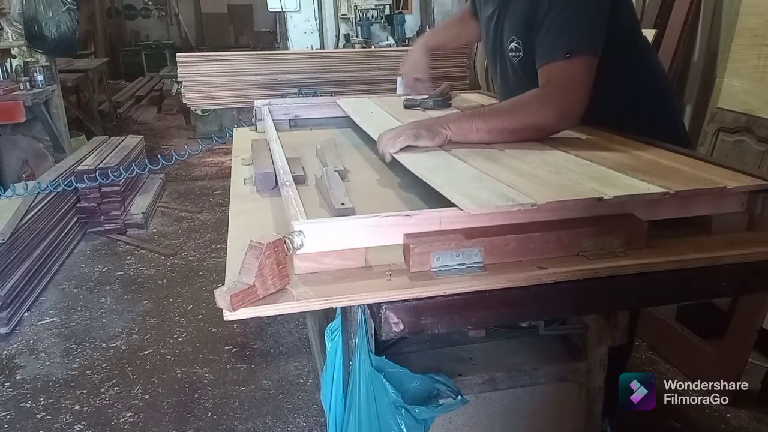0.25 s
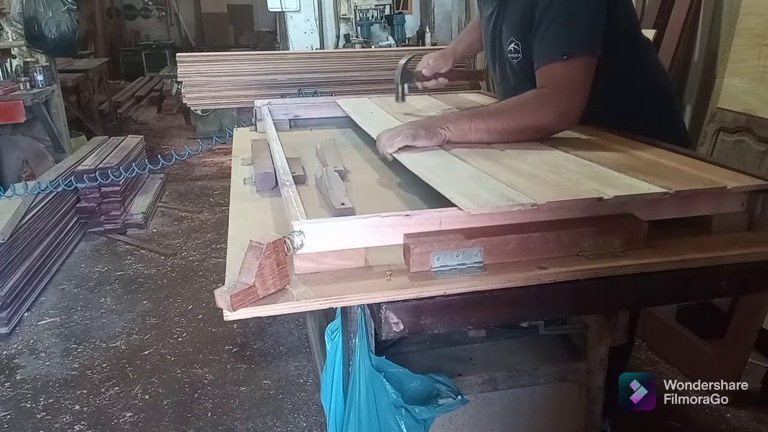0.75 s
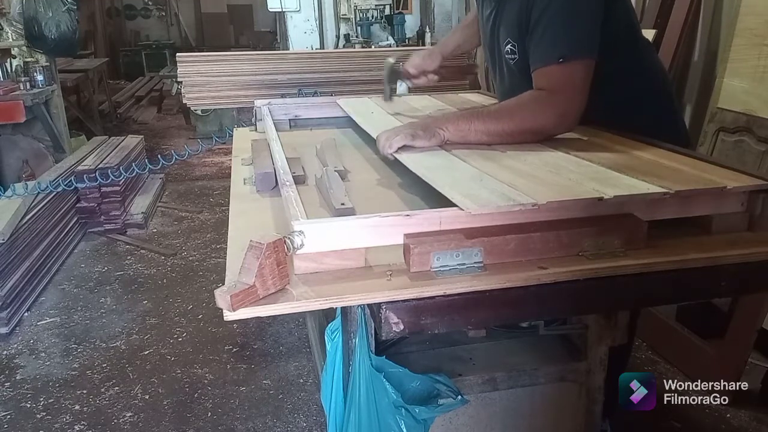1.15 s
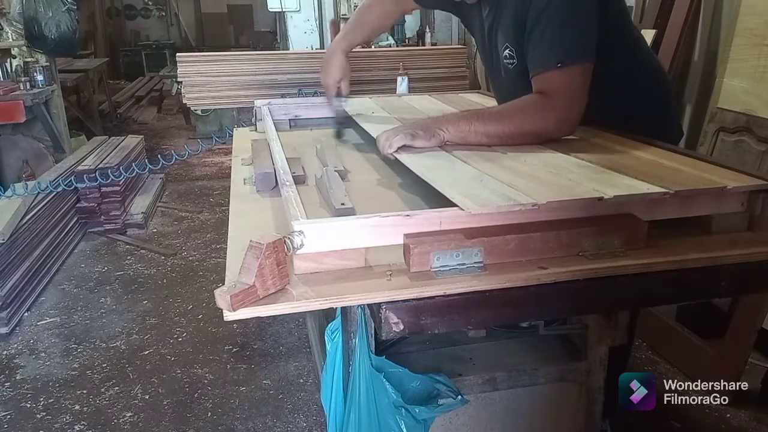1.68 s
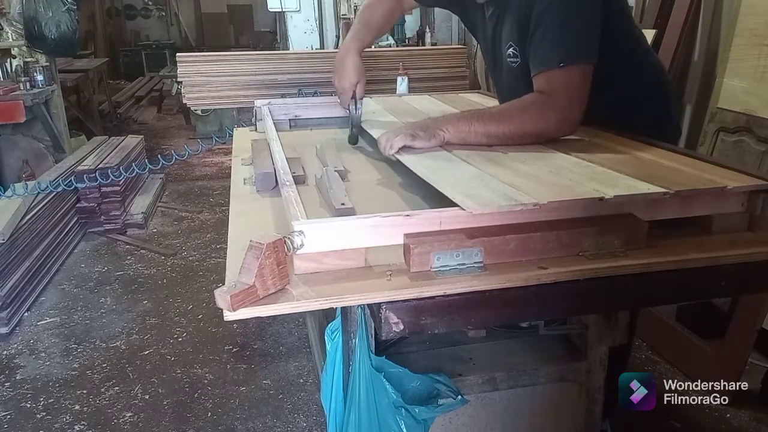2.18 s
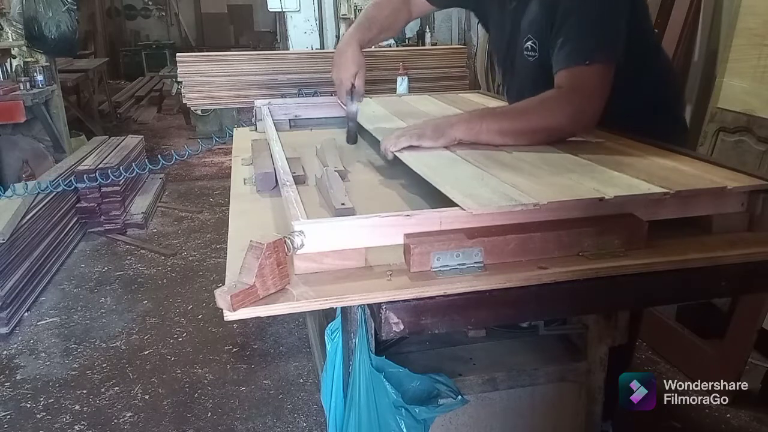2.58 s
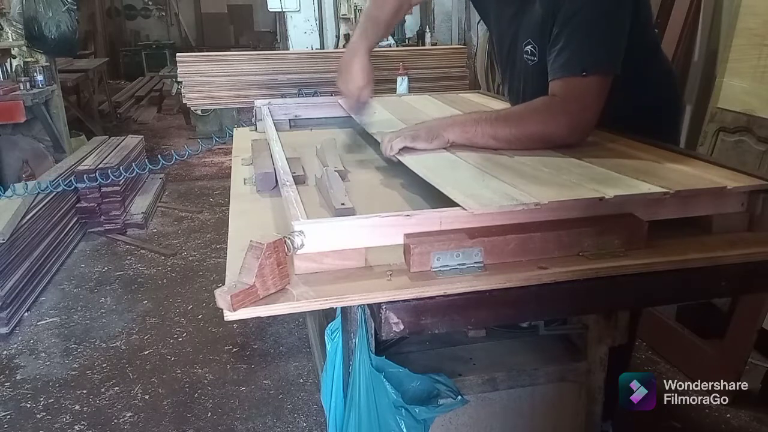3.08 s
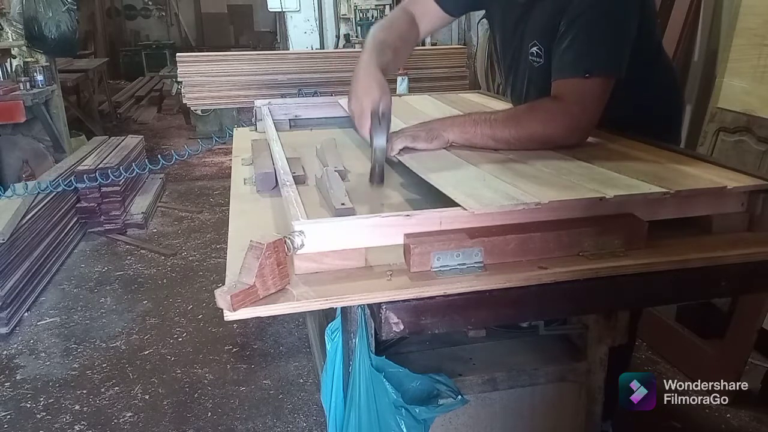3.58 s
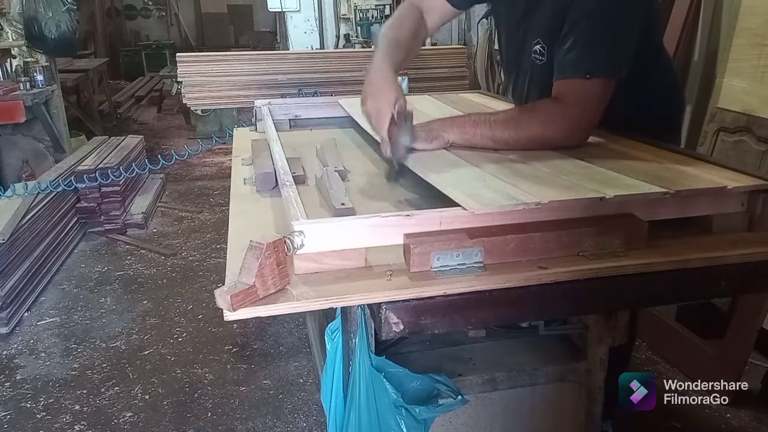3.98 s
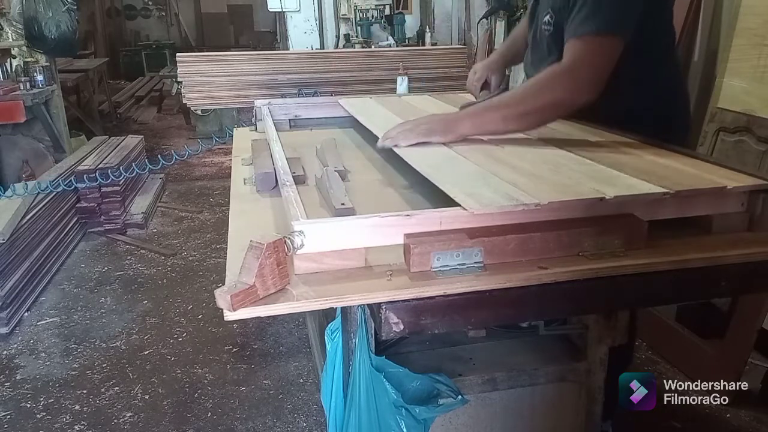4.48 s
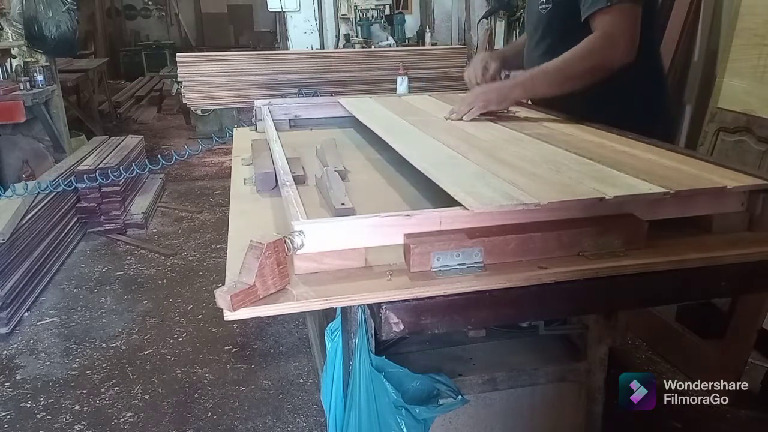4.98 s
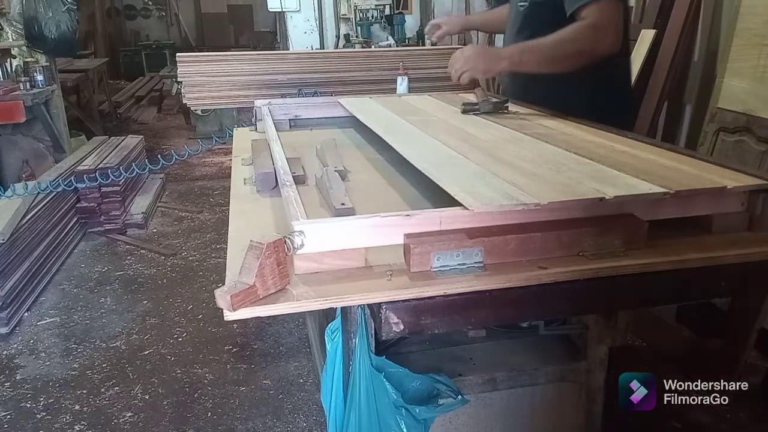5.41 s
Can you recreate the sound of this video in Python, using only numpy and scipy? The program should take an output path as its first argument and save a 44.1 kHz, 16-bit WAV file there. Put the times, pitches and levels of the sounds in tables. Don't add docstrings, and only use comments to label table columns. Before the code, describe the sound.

In a workshop, a hammer and hand knock wooden boards tight on a hollow bench. Uneven blows, singly and in close pairs, give sharp cracks, brief board ringing and low thuds with a rattling room tail. Boards slide softly between some blows. After the last bright knocks comes a near-silent pause with a faint insect, then light scrapes and clicks. A phone a few steps away hears it dull on top.

```python
import sys
import numpy as np
from scipy import signal
from scipy.fft import rfft, irfft, next_fast_len
from scipy.io import wavfile
from scipy.ndimage import uniform_filter1d

SR = 44100
rng = np.random.default_rng(int(sys.argv[2]) if len(sys.argv) > 2 else 0)


def gain_from_db(level_db):
    decades = np.asarray(level_db, float) / 20
    return 10 ** decades


def wav_record(signal):
    frames = np.transpose(np.atleast_2d(signal))
    bounded = np.clip(frames, -1, 1)
    quanta = np.round(bounded * 32767).astype(np.int16)
    wavfile.write(sys.argv[1], SR, quanta)


N = 249165
TIME = np.arange(N) / SR
STEP = 16
FAST = next_fast_len(N)
HZ = np.arange(FAST // 2 + 1) * SR / FAST + 1
BANDS = 143 * 2 ** (np.arange(19) / 3)

# f/Hz, level/dB per Hz
FLOOR_COLOUR = [(30, -18.5), (100, -7.5), (350, 0.5), (700, -3.5), (1200, -12), (3000, -13), (7400, -21),
                (8200, -30.5)]
# start t/s, length/s, f/Hz, level/dB
HUM_LINES = [(5.04, .17, 640, -73), (5.21, .11, 640, -72), (5.05, .14, 1285, -79), (4.98, .25, 5600, -93),
             (4.7, .12, 3900, -86), (3.16, .07, 335, -63), (3.225, .055, 340, -59), (4.72, .07, 5600, -90),
             (4.8, .15, 620, -82), (1.13, .07, 560, -78), (.1, .1, 800, -54)]
# start t/s, length/s, level/dB
INSECT_CALLS = [
    (4.682, 0.2, -77),
    (4.84, .45, -81),
    (4.905, 0.16, -67),
    (5.07, .12, -80),
    (5.17, .1, -79),
]
# start t/s, length/s, level/dB,
# colour/octaves over 1 kHz, swelling share of stroke
SLIDES = [(-.1, 0.48, -46, -2, 0.27), (-.1, 0.4, -52.5, 1.4, 0.2), (0.107, 0.033, -37, -2, 0.47),
          (0.162, 0.086, -53, -0.5, 0.36), (1.859, 0.16, -48, -2, 0.23), (1.873, 0.23, -42, 1.42, 0.42),
          (2.067, 0.13, -55, 1.44, 0.64), (2.059, 0.24, -62.5, 0.5, 0.31), (2.174, 0.17, -58, 1.36, 0.5),
          (3.8, 0.32, -56, -2, .4), (3.894, 0.17, -56, 1.2, 0.61), (3.745, 0.1, -53, 0, 0.098),
          (0.194, 0.2, -49, -2.0, 0.3), (3.62, .25, -64, 1.6, .4), (0, .12, -54, .6, .3),
          (.14, .06, -54, .8, .5), (.185, .04, -58, 2.4, .4), (0.394, 0.056, -74, 2.5, 0.54),
          (3.952, 0.68, -42, 1.37, 0.26), (4.024, 0.15, -39, -2.5, 0.28), (4.993, .12, -66, 0.3, 0.32),
          (5.208, 0.2, -52, 2.2, 0.4), (5.25, 0.31, -50, 1.9, 0.27), (5.295, 0.2, -51, 0.7, 0.15),
          (5.422, 0.25, -50, 0.8, 0.41), (5.56, 0.2, -50, 2, 0.4), (5.475, .13, -50, .8, .25),
          (5.36, .22, -56, 2.3, .5), (5.282, 0.55, -67, -0.8, 0.6)]

# t/s, thud level/dB, knock level/dB,
# knock colour/octaves over 1 kHz, length share
BLOWS = [(.110, -33.5, -48, -0.0033, 0.69), (0.4482, -23.5, -8, 0.3, 0.99), (.5910, -19, -9, 0.75, 1.08),
         (1.2040, -16, -20, 0.88, 0.96), (1.4356, -12, -13, 0.44, 0.87), (1.6641, -15.5, -11.5, 1.33, 1.12),
         (2.3220, -13, -22.5, 0.38, 0.89), (2.4927, -9.5, -17, 0.68, 0.87),
         (2.6940, -9.5, -13.5, 0.5, 0.99), (3.2785, -12, -31, 0.11, .9), (3.3092, -13, -24, 1.0, 0.94),
         (3.4672, -11.5, -21, 0.42, 0.87), (3.535, -25.5, -36.5, -.6, 1.15),
         (3.7483, -32, -38.5, -1.37, 0.83), (4.0258, -20.5, -27.5, -0.42, 0.89),
         (4.2189, -15, -18, -0.098, 1.23), (4.335, -19.5, -13, -0.038, 0.92), (4.4004, -48, -25, 0.4, 1.2),
         (5.002, -67.5, -69, -.9, 1.15)]
# bench level/dB, favoured bench mode/octaves over 200 Hz,
# board level/dB, boom level/dB
DRIVES = [(-34.5, .32, -41.5, -55), (-14.5, 0.23, -13, -40.5), (-18.5, 0.21, -15.5, -36.5),
          (-15.5, 0.27, -13.5, -32), (-23, .13, -17, -33.5), (-22, 0.29, -12.5, -35),
          (-14, 0.12, -20, -31.5), (-18, .1, -25.5, -31.5), (-18.5, 0.28, -18, -30.5), (-17, 0.5, -23, -45),
          (-16, .2, -32, -44.5), (-15, .1, -24, -37), (-17.5, 0.017, -45.5, -46.5), (-35, .26, -40.5, -54),
          (-21.5, 0.35, -33, -42.5), (-18.5, .02, -17, -50), (-23, 0.25, -27, -48),
          (-30.5, 0.29, -37, -49.5), (-68, 0.48, -58, -92)]
# t/s, level/dB
BUMPS = [
    (.74, -41),
    (.92, -54),
    (1.96, -51.5),
    (2.17, -58),
    (3.12, -65.5),
]
# f/Hz, width/octaves, level/dB
BOOM_MODES = [(67, 0.14, -14), (89.7, 0.079, -6), (122, 0.28, -2)]
# f/Hz, t60/s
TAIL_T60 = [(60, 0.94), (150, 0.74), (300, 0.59), (800, 0.53), (2000, 0.44), (4500, 0.37), (7500, 0.26)]
# f/Hz, exponent
TAIL_BEND = [(80, 0.88), (300, 1.25), (1500, 1.085), (7000, 1.18)]
# f/Hz, time/ms
SWELL = [(60, 40), (150, 51), (300, 2.2), (800, 1.2), (2000, 1.8), (7500, 0.94)]
# f/Hz, level/dB
LINGER = [(60, -18.5), (150, -17), (400, -35), (1000, -43.5), (2500, -69.5)]
# f/Hz, level/dB
EARLY = [(200, -9), (600, 3), (2000, 5.5), (7000, -3.5)]
# f/Hz, level/dB
EDGE = [(40, -41), (70, -32), (110, -12), (200, 2.5), (3000, 0.5), (4700, -4.5), (6300, 3), (7600, -8.5)]

# t/s, peak level/dB, f/Hz, t60/s
HOLLOWS = [(.112, -33, 328, 0.15), (.195, -38, 290, .2), (.451, -21, 280, .15), (.453, -22, 411, 0.13),
           (.488, -19, 533.6, 0.27), (.53, -20, 266, .14), (.598, -20.5, 290.5, .12),
           (.625, -23.5, 530, 0.4), (.670, -20, 276, .13), (1.212, -14, 296, .12), (1.216, -20, 493, 0.13),
           (1.262, -19.5, 199.5, 0.18), (1.439, -20.5, 417, 0.13), (1.444, -19, 596, .12),
           (1.452, -16.5, 236.6, .13), (1.49, -24, 488, .15), (1.668, -19.5, 210.4, 0.097),
           (1.677, -20, 306, .12), (1.668, -22.5, 572, .18), (1.703, -21, 515, .2), (1.738, -21, 291, .14),
           (2.327, -22, 400.5, 0.15), (2.330, -16, 202, 0.15), (2.384, -18.5, 190, 0.18),
           (2.496, -16.5, 168.3, .12), (2.508, -11.5, 295.3, .13), (2.562, -20, 199.4, 0.14),
           (2.572, -22.5, 280, .12), (2.697, -21, 158, .12), (2.705, -11.5, 282.8, .15),
           (2.707, -21.5, 687, 0.11), (2.76, -18, 186.4, .15), (2.777, -20, 277, .13),
           (3.280, -8, 312.4, .1), (3.328, -8, 255, .08), (3.331, -19, 195.5, 0.33),
           (3.467, -20, 411, 0.11), (3.48, -8, 289, .08), (3.477, -11, 194.8, .15), (3.528, -21.5, 296, .1),
           (3.532, -12.5, 193.7, 0.13), (3.64, -28, 185.2, 0.26), (3.754, -30, 306, 0.12),
           (4.03, -24.5, 203, .23), (4.22, -19.5, 402, .1), (4.221, -13.5, 205.8, 0.22),
           (4.271, -21, 204.4, 0.28), (4.357, -20, 226, 0.17), (4.425, -23.5, 250, 0.11)]
# f/Hz, width/Hz, level/dB
BENCH_MODES = [(154.2, 5, -1), (173, 11, -3.5), (196.5, 6.7, -2), (208, 25, -9.5), (247.7, 22, -7),
               (270.9, 5.8, -2.5), (288, 14, -1), (312, 21, -0.5), (328, 11, -7), (378, 5.9, -3.5),
               (400, 6.4, -5)]
# f/Hz, width/Hz, level/dB
BOARD_MODES = [(472, 14, -10), (526.9, 11, -3), (556, 7.8, -5), (648, 4.8, -6.5), (783, 22, -7),
               (862, 14, -9.5), (974, 75, -4.5), (1207, 42, -6), (1500, 42, -7), (1660, 64, -10),
               (1900, 39, -13.5), (2020, 22, -12), (2420, 46, -12.5), (2710, 33, -15.5)]
# t/s, peak level/dB, f/Hz, t60/s
PINGS = [(.078, -43, 2390, 0.042), (0.4492, -13.5, 1184, 0.064), (0.448, -20, 1440, 0.053),
         (.4489, -18.5, 2300, .03), (.456, -15, 813, .09), (.498, -23.5, 826, .07),
         (0.5914, -13.5, 2500, .03), (0.5923, -18.5, 2740, 0.032), (.592, -17.5, 1766, 0.034),
         (0.591, -19.5, 1475, 0.044), (.594, -16.5, 1270, .05), (.599, -21.5, 940, 0.068),
         (1.207, -24.5, 1005, .07), (1.208, -18, 1256, 0.091), (1.439, -14, 1405, .05),
         (1.4418, -16, 950, 0.073), (1.4415, -14, 1780, 0.048), (1.441, -22, 2050, 0.032),
         (1.668, -16, 1460, 0.048), (1.668, -17.5, 1104, 0.056), (1.668, -19.5, 969, .05),
         (1.668, -14.5, 740, 0.067), (1.669, -19.5, 2140, .035), (1.67, -19, 2570, 0.038),
         (2.325, -19, 684, .07), (2.497, -20, 1432, 0.13), (2.502, -18.5, 2020, .04),
         (2.6975, -19, 2300, .035), (2.699, -17, 1580, 0.037), (2.700, -16.5, 907, 0.047),
         (2.701, -18, 1930, .045), (2.71, -20, 1335, .06), (2.716, -18, 1436, .07), (3.47, -22, 840, 0.035),
         (3.475, -25.5, 1205, 0.071), (3.898, -68, 6400, .03), (4.163, -46, 2500, .06),
         (4.2196, -17, 2010, 0.037), (4.219, -11.5, 1420, .045), (4.2215, -15.5, 910, 0.077),
         (4.337, -20.5, 810, .05), (4.338, -19, 1050, 0.054), (4.3383, -7, 1230, .045),
         (4.338, -13.5, 1670, .045), (4.337, -21.5, 1922, .035), (4.4018, -17, 1200, .045),
         (4.4008, -16, 1350, .04), (5.493, -53, 1900, .08)]
# t/s, peak level/dB, f/Hz, ring/cycles
TICKS = [(.4519, -12, 1100, .7), (.462, -16, 900, .9), (.4693, -15, 800, .8), (.5945, -15, 1800, .6),
         (.6378, -16, 1800, .6), (1.2105, -19, 2300, 1.2), (1.2135, -18, 1900, 1), (1.4375, -25, 6500, 3),
         (1.4442, -14, 1200, .6), (1.6715, -13, 1300, .7), (1.675, -14, 1300, .7), (2.496, -24, 6500, 2),
         (2.5035, -24, 5700, 2), (2.5078, -18, 2200, .7), (3.283, -35, 4300, 1.5), (3.3118, -26, 4300, 1.2),
         (3.3135, -25, 2700, 1.2), (3.3152, -28, 4800, 1.2), (3.318, -21, 1100, 1),
         (3.4685, -26, 4000, 1.2), (3.4705, -27, 3600, 1.2), (3.4745, -27, 4600, 1),
         (3.477, -27, 5000, 1.2), (3.4765, -23, 2400, 1), (4.2195, -18, 2900, .8), (4.2218, -13, 1200, .8),
         (4.3375, -8, 2500, .8), (4.348, -21, 3500, 1), (4.4012, -24, 2800, 1), (5.322, -51, 4200, 4),
         (5.39, -56, 3600, 8), (5.496, -55, 3500, 6), (5.575, -54, 1100, 5), (.0795, -45, 2450, 6)]
# t/s, peak level/dB, f/Hz, ring/cycles
CRACKS = [(.0787, -39, 2580, 1.6), (.0795, -41, 5760, .8), (0.114, -39, 2000, 0.75), (0.449, 1, 1930, 0.6),
          (0.5913, 0.5, 2350, .8), (1.2072, -16, 3200, 0.93), (1.2078, -20, 6140, 4), (1.438, -16, 2600, 3),
          (1.4419, -5.5, 1510, 0.51), (1.6655, -12.5, 4100, 2.6), (1.6662, -9, 6300, 2.2),
          (2.325, -16, 1900, 0.72), (2.497, -16, 2290, 0.78), (2.6946, -13.5, 2830, 0.61),
          (2.7003, -9, 2290, 1.5), (3.2785, -29, 2660, 0.4), (3.3103, -20, 2950, 0.5),
          (3.47, -19, 3190, 0.6), (3.475, -37.5, 2450, 1.2), (3.7482, -38.5, 1680, 0.82),
          (3.755, -53, 4500, 0.56), (4.024, -24.5, 1840, 0.59), (4.2202, -8, 1940, .9),
          (4.3369, -4.5, 2340, 0.75), (4.4012, -10.5, 1920, 0.52), (5.3213, -39, 3600, 0.8),
          (5.491, -45, 2000, .9), (5.6282, -38, 2880, 0.49)]
# from t/s, to t/s, level/dB
DUCKS = [
    (.577, .590, -19),
    (1.182, 1.2025, -10),
    (1.652, 1.663, -11),
    (2.485, 2.492, -4),
    (3.455, 3.4665, -4),
    (4.318, 4.335, -4),
    (4.388, 4.3995, -4),
]


def on_log(table, hz):
    f, v = np.transpose(table)
    return np.interp(np.log(hz), np.log(f), v)


def shaped(gain):
    x = irfft(rfft(rng.standard_normal(FAST)) * gain, FAST)[:N]
    return x / np.std(x)


def band(hz, octaves=.2, ripple=1):
    return shaped(ripple * np.exp(-.5 * (np.log2(HZ / hz) / octaves) ** 2))


def walk(rate):
    k = int(SR / rate)
    return uniform_filter1d(np.repeat(rng.standard_normal(N // k + 1), k), k)[:N]


def add(out, s, x):
    i = int(s * SR)
    out[i:i + len(x)] += x[:len(out) - i]


def full(slow):
    return np.interp(np.arange(N) / STEP, np.arange(len(slow)), slow)


def after(times, shapes):
    slow = np.zeros(N // STEP + 2)
    for s, shape in zip(times, shapes):
        add(slow, s / STEP, shape)
    return full(slow)


def stroke(s, length, swell):
    top = s + length * np.clip(swell, .05, .95)
    u = np.interp(TIME[::STEP], [s, top, s + length], [0, 1, 0])
    return np.sin(np.pi / 2 * u) ** 1.51


def floor():
    return gain_from_db(-77.5 + 1.5 * walk(36)) * shaped(gain_from_db(on_log(FLOOR_COLOUR, HZ)))


def machine_lines():
    cycles_per_hz = np.cumsum(1 + .006 * walk(90)) / SR
    flicker = gain_from_db(2.5 * walk(50))
    out = np.zeros(N)
    for s, length, hz, db in HUM_LINES:
        out += full(stroke(s, length, .4)) * gain_from_db(db) * np.sin(2 * np.pi * hz * cycles_per_hz)
    return flicker * out


def insect():
    size = full(sum(gain_from_db(db) * stroke(s, length, 0.5) for s, length, db in INSECT_CALLS))
    hz = 3215 + 8 * walk(17) + 30 * walk(160) - 90 * (TIME < 4.83)
    return size * gain_from_db(-2.5 + 3.0 * walk(60)) * np.sin(2 * np.pi * np.cumsum(hz) / SR)


def slides():
    out = np.zeros(N)
    grain = walk(450) + .4 * walk(40)
    s, length, db, colour, swell = np.transpose(SLIDES)
    shapes = np.array([stroke(*row) for row in zip(s, length, swell)])
    for hz in BANDS:
        over = np.log2(hz / 1000) - colour
        share = gain_from_db(db + np.where(over > 0, -8.5, 12) * over)
        patches = 1.5 * grain + 2.2 * walk(25)
        size = full(np.sqrt(share ** 2 @ shapes ** 2))
        out += size * gain_from_db(0.74 * on_log(EDGE, hz) - 9.0 + patches) * band(hz, 0.2)
    return out


def boom():
    rise_s, t60_s, rest_db = 0.016, .8, -87.5
    t = np.arange(0, int(1.2 * SR), STEP) / SR
    shape = (1 - np.exp(-t / rise_s)) ** 2 * gain_from_db(4.5 - 60 * t / t60_s)
    blows = [np.array(BLOWS)[:, 0], np.array(DRIVES)[:, 3]]
    s, db = np.hstack([blows, np.transpose(BUMPS)])
    power = after(s, (gain_from_db(db)[:, None] * shape) ** 2) + gain_from_db(rest_db) ** 2
    return np.sqrt(power) * sum(gain_from_db(own_db) * band(hz, octaves) for hz, octaves, own_db in BOOM_MODES)


def room_modes():
    spacing_hz, spread_db = 22.04, 2.5
    grid = np.arange(0, SR / 2 + 100, spacing_hz)
    return gain_from_db(spread_db * np.interp(HZ, grid, rng.standard_normal(len(grid))))


def tails():
    thud_hz, thud_db_per_oct, knock_db_per_oct2 = 280, -11, -2
    linger_t60_s, early_s = 0.93, 0.021
    hush_db, hush_over_hz, hush_ragged_db = -81, 900, 5
    out = np.zeros(N)
    t = np.arange(0, int(1.4 * SR), STEP) / SR
    rows, rattle, room = np.array(BLOWS), walk(260), room_modes()
    for hz in BANDS:
        rise = (1 - np.exp(-t * 1000 / on_log(SWELL, hz))) ** 2
        thud = gain_from_db(rows[:, 1:2] + thud_db_per_oct * max(np.log2(hz / thud_hz), 0))
        knock = gain_from_db(rows[:, 2:3] + knock_db_per_oct2 * (np.log2(hz / 1000) - rows[:, 3:4]) ** 2)
        fade_db = -60 * (t / (rows[:, 4:] * on_log(TAIL_T60, hz))) ** on_log(TAIL_BEND, hz)
        linger_db = on_log(LINGER, hz) - 60 * t / linger_t60_s
        early_db = on_log(EARLY, hz) - 9 * t / early_s
        decay = gain_from_db(fade_db) ** 2 + gain_from_db(linger_db) ** 2 + gain_from_db(early_db) ** 2
        power = after(rows[:, 0], rise * (thud ** 2 + knock ** 2) * decay)
        power = power * gain_from_db(on_log(EDGE, hz) - 17.0) ** 2
        drift = walk(40)
        patches = 1.5 * rattle + 1.2 * drift
        hush = (hz > hush_over_hz) * gain_from_db(hush_db - hush_ragged_db * drift) ** 2
        kept = power / (power + hush + 1e-30)
        out += np.sqrt(power) * kept * gain_from_db(patches) * band(hz, 0.22, room)
    return out


def hollows():
    out, t = np.zeros(N), np.arange(int(.35 * SR)) / SR
    for s, db, hz, t60 in HOLLOWS:
        swell = 1 - np.exp(-t * hz)
        add(out, s, gain_from_db(db + 2.5 - 60 * t / t60) * swell * np.sin(2 * np.pi * hz * t))
    return out


def bench():
    bench_db_per_oct2, board_reach_db_per_oct = -30.5, -10
    out, t = np.zeros(N), np.arange(0, int(.6 * SR), STEP) / SR
    modes = BENCH_MODES + BOARD_MODES
    rows, chance = np.array(BLOWS), rng.standard_normal((len(BLOWS), len(modes)))
    bench_db, favoured, board_db = np.transpose(DRIVES)[:3]
    for k, (hz, width, db) in enumerate(modes):
        bench_share = gain_from_db(bench_db + bench_db_per_oct2 * (np.log2(hz / 200) - favoured) ** 2)
        board_share = gain_from_db(board_db + board_reach_db_per_oct * max(np.log2(530 / hz), 0))
        share = np.hypot(bench_share, board_share)
        size = (share * gain_from_db(db + 1.5 * chance[:, k]))[:, None]
        blow = 0.032 * np.exp(-t * hz / 2.5)
        loose = 0.0099 * np.exp(-t / (0.073 * rows[:, 4:]))
        push = after(rows[:, 0], size * (blow + loose)) * rng.standard_normal(N)
        p = np.exp(-np.pi * width / SR)
        w = 2 * np.pi * hz / SR
        out += np.sin(w) * signal.lfilter([1], [1, -2 * p * np.cos(w), p * p], push)
    return out


def pings():
    out, t = np.zeros(N), np.arange(int(.15 * SR)) / SR
    for s, db, hz, t60 in PINGS:
        pair = np.sin(2 * np.pi * hz * t) + 0.3 * np.sin(2 * np.pi * 1.2 * hz * t)
        add(out, s, gain_from_db(db - 0.5 - 60 * t / t60) * (1 - np.exp(-t / 0.00026)) * pair)
    return out


def burst(t, hz, cycles, phase=0):
    return np.cos(2 * np.pi * hz * t + phase) * np.exp(-(t * hz / max(cycles, .3)) ** 2)


def ticks():
    out, t = np.zeros(N), np.arange(-600, 600) / SR
    for s, db, hz, cycles in TICKS:
        add(out, s + t[0], gain_from_db(db) * burst(t, hz, cycles))
    return out


def cracks():
    chatter_cycles, chatter_top_ms = 9, 4.9
    out, t = np.zeros(N), np.arange(-200, 200) / SR
    chance = rng.random((len(CRACKS), 8, 3))
    for (s, db, hz, cycles), draws in zip(CRACKS, chance):
        chatter_ms = min(chatter_top_ms, 1000 * chatter_cycles / hz)
        for k, (when, size, pitch) in enumerate(draws):
            again = k > 0
            f = hz * (1 + again * 1.5 * (pitch - .45))
            tick = burst(t, f, cycles, again * 2 * np.pi * size)
            late = again * (.0008 + when * chatter_ms * .002)
            add(out, s + t[0] + late, tick * gain_from_db(db - again * (8 + 5 * size + 7 * when)))
    return out


def scene():
    room = slides() + boom() + tails()
    wood = hollows() + gain_from_db(-3) * bench() + pings()
    contacts = ticks() + cracks()
    return (room + wood + contacts)[None, :]


def phone_gain():
    gate_s, gate_open_s, gate_db, gate_fall_s = 4.755, 4.99, -22, 0.034
    squeeze_over_db, squeeze_share, squeeze_late_s, squeeze_release_s = -10.5, 0.61, 0.0014, 0.036
    gain_db = np.zeros(N)
    for a, b, db in DUCKS:
        gain_db[int(a * SR):int(b * SR)] = db
    gain_db += gate_db * np.clip((TIME - gate_s) / gate_fall_s, 0, 1) * (TIME < gate_open_s)
    release = np.exp(-TIME[:SR // 2] / squeeze_release_s)
    for s, db, *_ in CRACKS:
        add(gain_db, s + squeeze_late_s, -squeeze_share * max(db - squeeze_over_db, 0) * release)
    return gain_from_db(uniform_filter1d(gain_db, size=50))


def top_cut(x):
    return signal.sosfilt(signal.butter(12, 15700, fs=SR, output="sos"), x)


def record(dry):
    ceiling = .8
    x = dry * phone_gain()
    x = x / (1 + abs(x / ceiling) ** 4) ** .25
    x = signal.sosfilt(signal.butter(4, 68, "high", fs=SR, output="sos"), x)
    cut = signal.sosfilt(signal.cheby1(7, 1, 7380, fs=SR, output="sos"), x)
    mirror = cut * np.cos(2 * np.pi * 16000 * TIME)
    second = cut * np.cos(2 * np.pi * 20000 * TIME)
    near = signal.sosfilt(signal.butter(3, [8700, 11200], "band", fs=SR, output="sos"), mirror)
    far = signal.sosfilt(signal.butter(2, [12800, 15000], "band", fs=SR, output="sos"), second)
    background = floor() + machine_lines() + insect()
    return top_cut(cut + gain_from_db(-32.0) * near + gain_from_db(-44.5) * far + background)


dry = scene()
out = record(dry)
wav_record(out)
```